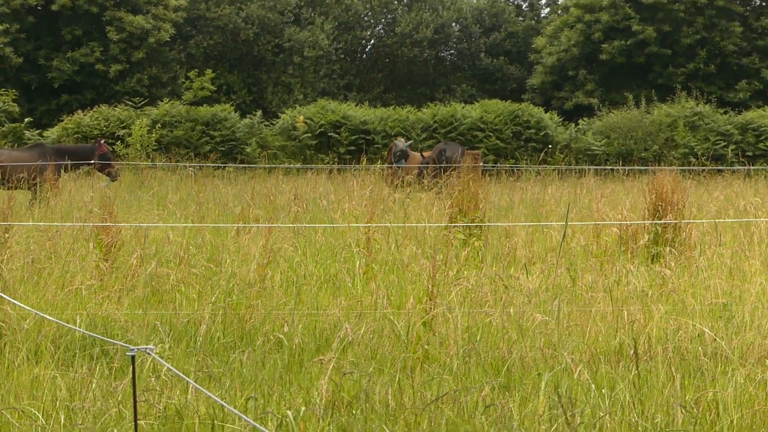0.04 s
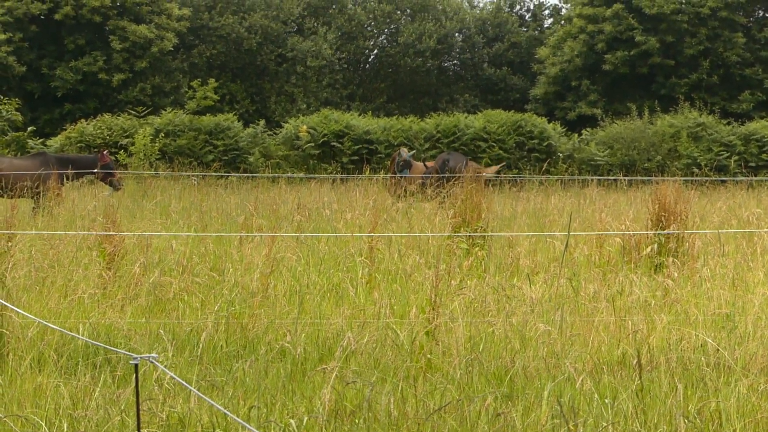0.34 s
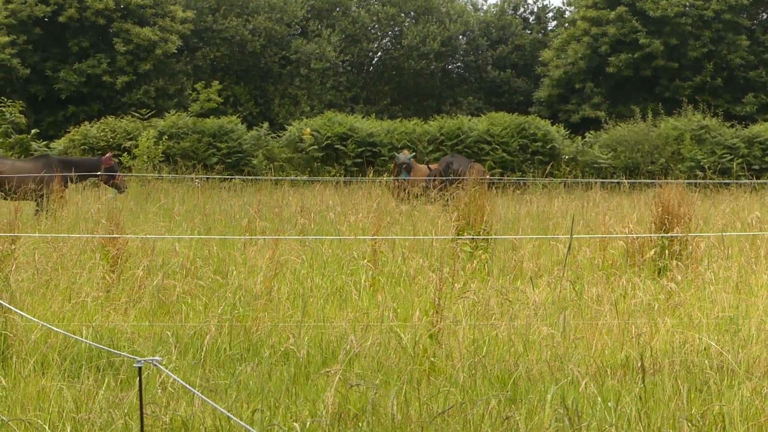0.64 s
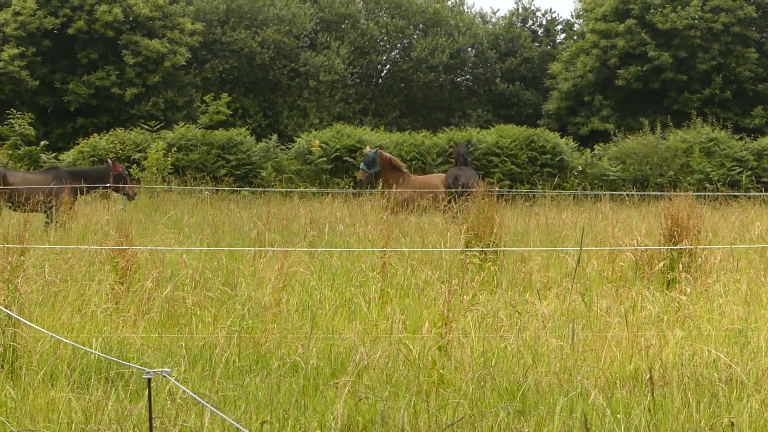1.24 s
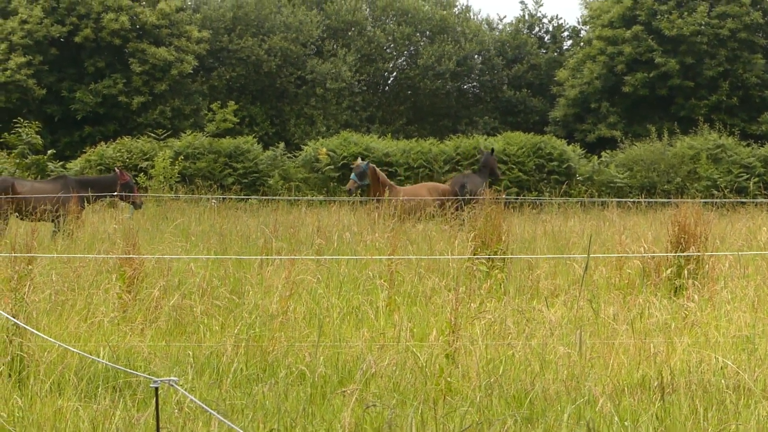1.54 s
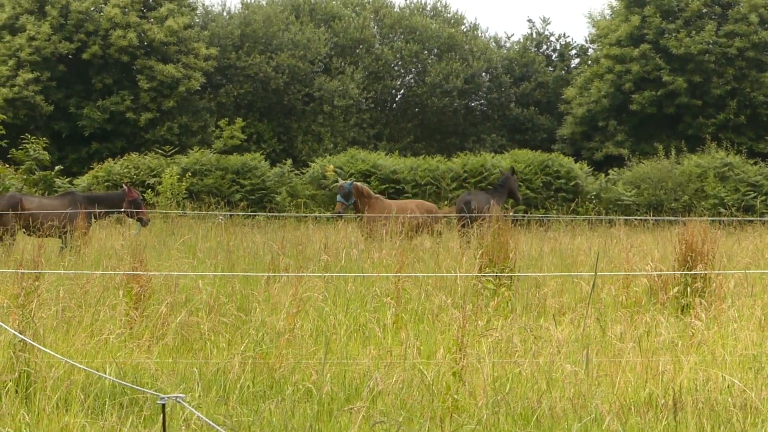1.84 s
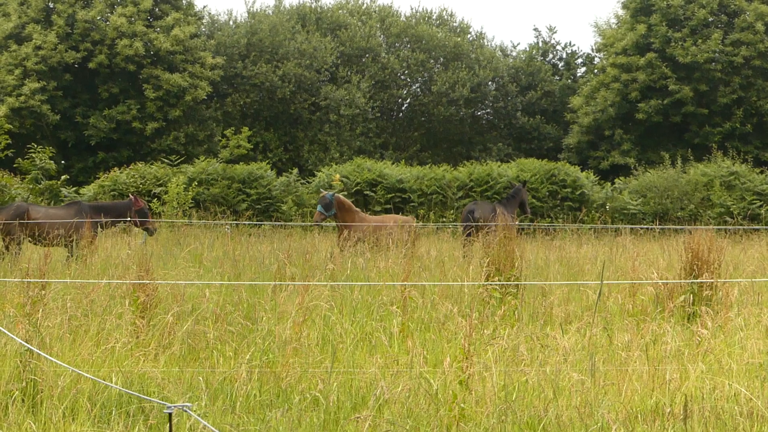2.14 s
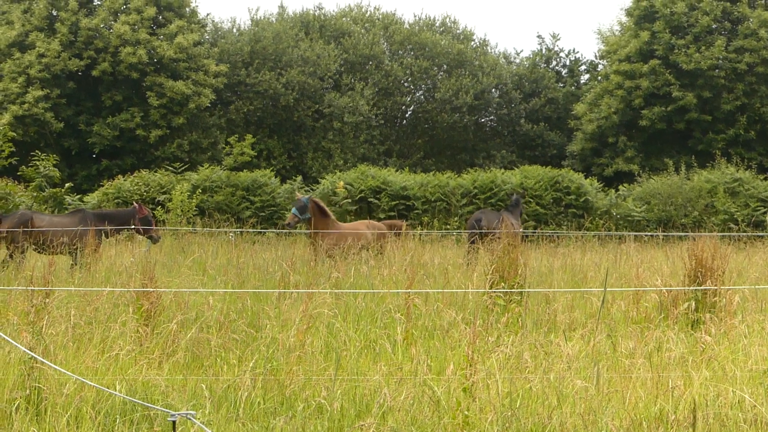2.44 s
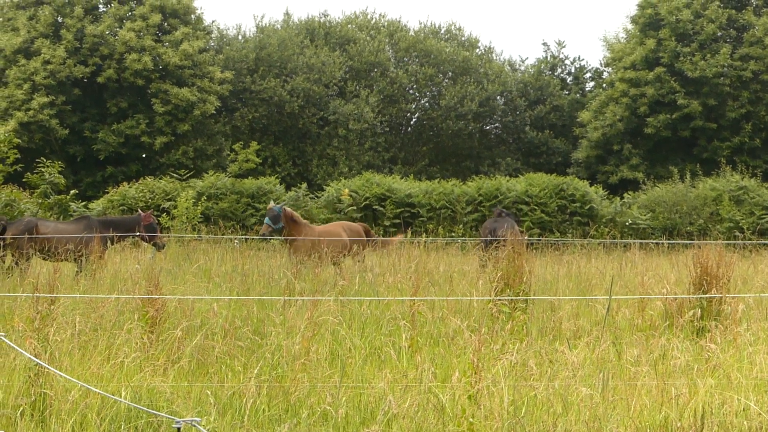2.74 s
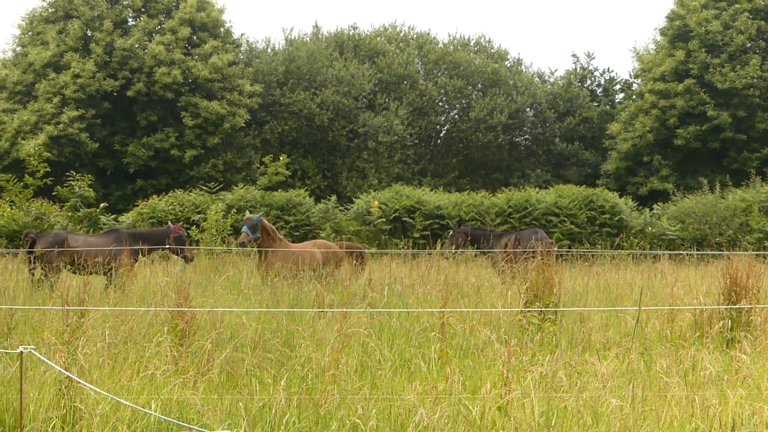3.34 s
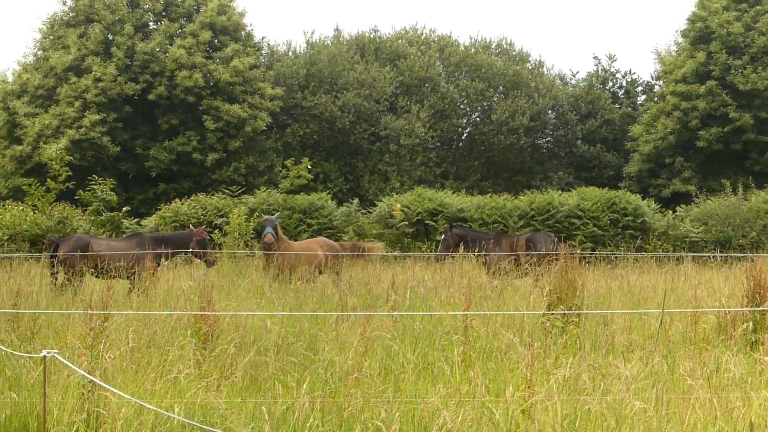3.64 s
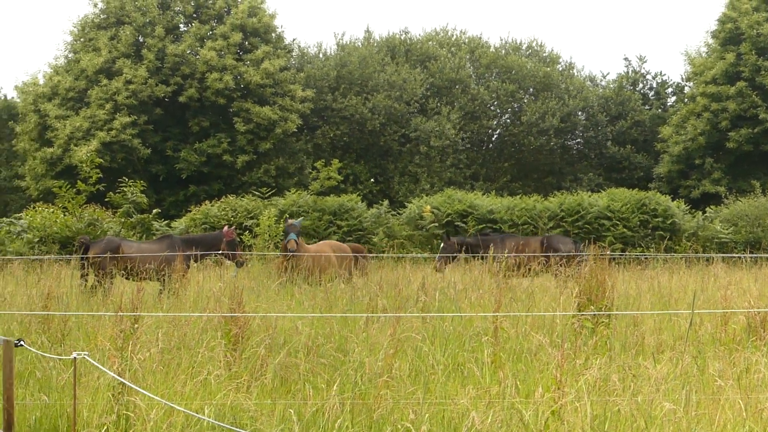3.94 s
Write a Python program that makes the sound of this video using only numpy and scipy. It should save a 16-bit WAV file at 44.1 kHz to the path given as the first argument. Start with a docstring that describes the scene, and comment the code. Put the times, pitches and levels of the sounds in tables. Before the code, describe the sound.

A horse's short, harsh squeal, followed by rustling grass and a songbird, with wind rumbling.

```python
"""A pasture edged by a hedge and trees, in stereo; low wind rumbles throughout over a faint hiss.
Faint birds call far off to the right. Across the grass a horse squeals: a thin rising tone in its
throat breaks under strain into a harsh scream, clears and falls away. It grunts, and the horses
scuffle in long grass. Nearer the microphone a finch sings from the hedge in gliding whistles (four
slurs, a trill, two buzzes, a flourish). The trees scatter every voice back."""
import sys
import numpy as np
from scipy import signal
from scipy.fft import rfft, irfft, next_fast_len
from scipy.io import wavfile
from scipy.ndimage import uniform_filter1d, map_coordinates

SR = 44100
rng = np.random.default_rng(int(sys.argv[2]) if len(sys.argv) > 2 else 0)


def dump_mix(stems):
    """Bounce the given channels to the path in sys.argv[1] as a 16-bit WAV at rate SR."""
    frames = np.atleast_2d(stems).T  # one column per channel
    limited = np.clip(frames, -1, 1)  # hard clip at full scale
    pcm = np.round(limited * 32767).astype(np.int16)
    wavfile.write(sys.argv[1], SR, pcm)


N = 176400

# Levels in the tables are relative; each source applies its own gains on top.
# Gusts at the microphone, roar and rumble: time_s, level_db
ROAR_GUSTS = [(0, -45), (.6, -30), (.88, -36.5), (1.02, -43.5), (1.25, -43.5), (1.65, -36.5), (1.9, -41),
              (2.12, -38), (2.45, -52), (3.2, -49), (4, -49.5)]
RUMBLE_GUSTS = [(0, -45.5), (1.7, -48.5), (2.3, -51), (2.7, -61), (3.4, -62.5), (4, -47)]
# Spectra of the gusts, the treetop breeze and the hiss: frequency_hz, level_db
ROAR_COLOUR = [(140, -67), (200, -13.5), (248, 1), (285, -6), (350, -17), (400, -11.5), (460, -26.5),
               (520, -23), (700, -47), (3000, -88)]
RUMBLE_COLOUR = [(20, -40), (55, -41), (95, -6.5), (143, 4), (220, -9.5), (400, -52)]
BREEZE_COLOUR = [(60, -20.5), (150, -2.5), (540, -3), (800, -12.5), (2500, -36)]
HISS_COLOUR = [(100, -64), (900, 8.5), (1800, -1), (3000, 4), (7500, -5.5), (9500, -1.5), (11800, 1.5),
               (13000, 7.5)]
# How long the trees take to fall 60 dB: frequency_hz, decay_s
TREE_DECAY = [(2000, 0.39), (12000, 1)]

# Far birds' syllables, one list per note: offset_s, base_pitch_hz, level_db
THIN_NOTES = [
    [(-.03, 6550, -1), (.06, 5590, 2)],
]
ARCH_NOTES = [
    [(-.045, 2700, -1), (-.01, 3350, 1), (.035, 3470, -2)],
]
TWITTER_NOTES = [
    [(-.002, 3126, 1.1), (.018, 3010, 2)],
]
# When they call: time_s, level_db, pitch_factor
THIN_CALLS = [(.645, -63, 0.98), (0.821, -65.5, 0.85)]
ARCH_CALLS = [(1.58, -55.5, 0.99)]

# The squeal's tone: time_s, pitch_hz, level_db
SQUEAL_TONE = [(.945, 1054, -75), (.975, 1240, -47.5), (1.005, 1422, -50), (1.045, 1558, -50.5),
               (1.12, 1307, -60), (1.27, 1294, -43), (1.325, 1359, -71), (1.365, 1379, -59),
               (1.40, 1323, -53), (1.455, 1159, -54)]
# Its harmonics 1-4: early_db, late_db
SQUEAL_HARMONICS = [(0, -13), (-19, -8), (-4, -5), (-10, -2.5)]
# Its harsh middle: time_s, level_db
SCREAM_LEVEL = [(1.0, -63), (1.055, -48), (1.09, -38), (1.16, -36.5), (1.21, -38.5), (1.27, -38.5),
                (1.335, -44.5), (1.5, -62.5)]
# Resonances of the horse's throat: early_hz, late_hz, width_hz, early_db, late_db
THROAT_RESONANCES = [(1120, 1300, 560, -.5, -8), (1935, 1985, 150, 1.5, -2), (2380, 2420, 600, -1, -2),
                     (2620, 3120, 300, -16, -2.5), (3830, 3850, 170, -3, -.5),
                     (4330, 4390, 320, -2.5, -2.5), (5350, 5370, 400, -1, 3.5), (5950, 6150, 750, -9, -10)]
# Rasping breath in the scream: frequency_hz, level_db
RASP_COLOUR = [(250, -9), (400, 2), (780, -2), (2300, 1.5), (3200, -22), (3600, 5), (6300, -4),
               (7500, -16.5), (9700, -12), (15000, -35)]

# Grass as the horses scuffle, grass as they part, and the grunt: time_s, level_db
SCUFFLE_LEVEL = [(1.35, -61), (1.8, -51), (2.1, -59), (2.7, -75)]
PARTING_LEVEL = [(3.3, -56), (3.42, -55), (4, -51.5)]
GRUNT_LEVEL = [(1.68, -75), (1.78, -47), (1.84, -66)]
# Spectra of the same three: frequency_hz, level_db
SCUFFLE_COLOUR = [(300, -19), (1200, 5), (2200, 0), (4500, -4), (7000, -13), (15000, -74)]
PARTING_COLOUR = [(300, -5), (1000, -3), (5000, 4), (7500, -11.5), (10000, -5), (15000, -12)]
GRUNT_SPECTRUM = [(700, -20), (1150, 9.5), (1600, -25), (4400, -4), (6500, -32)]

# The finch's syllables, one list per note: offset_s, base_pitch_hz, level_db
SLUR_NOTES = [
    [(-.108, 6700, -10), (-.092, 5210, -8), (-.07, 3314, -9.5)],
    [(-.07, 4303, -12), (-.035, 4358, -5.5), (-.008, 4280, -11)],
    [(-.004, 5140, 7), (0, 4160, 6), (.005, 3890, 1.5), (.016, 3850, -12)],
]
TRILL_NOTES = [
    [(-.021, 3550, -12), (-.016, 4100, -6), (.002, 4100, -11)],
    [(-.01, 3000, -13), (.001, 3200, -8), (.003, 3330, 5), (.012, 3700, 0), (.046, 3480, -10)],
    [(.031, 2220, -6), (.049, 2980, 5), (.055, 2450, -1), (.066, 2260, 3), (.081, 2150, -4)],
]
BUZZ_NOTES = [
    [(-.018, 4960, 3), (-.008, 6000, -5), (.005, 4700, 4), (.038, 4180, -7)],
]
FLOURISH_NOTES = [
    [(-.065, 2577, 3.5), (-.045, 2136, -21), (-.018, 3440, -3), (.03, 3790, -2.5), (.05, 2660, -6),
     (.07, 2086, -11), (.1, 1980, -6)],
]
# When it sings them: time_s, level_db, pitch_factor
SLUR_CALLS = [(2.11, -50, 0.94), (2.309, -43.5, 0.93), (2.499, -39, 0.95), (2.692, -36.5, 0.93)]
TRILL_CALLS = [(2.782, -38.5, 1.03), (2.93, -37, 1.01), (3.078, -36, 1.02), (3.229, -35, 1.015),
               (3.382, -35.5, .99), (3.533, -36.5, 1)]
BUZZ_CALLS = [(3.686, -40, 0.93), (3.769, -40.5, 0.94)]
FLOURISH_CALLS = [(3.899, -29.5, 1)]

# Hooves scuffing through the grass: peak_s, level_db
HOOF_STEPS = [(3.41, -47), (3.492, -52), (3.657, -45), (3.818, -40), (3.981, -41.5)]
# Their spectrum: frequency_hz, level_db
HOOF_COLOUR = [(130, -14), (420, 7.5), (780, -8), (1200, -7.5), (1400, 6.5), (1660, -11.5), (2100, -3),
               (10000, -32)]


def amp(db):
    return 10 ** (np.asarray(db) / 20)


def unit(x):
    return x / np.sqrt(np.mean(x ** 2) + 1e-20)


def along(points, hz):
    """Read (frequency_hz, value) points on a log frequency axis."""
    frequencies, values = np.transpose(points)
    return np.interp(np.log(hz + 1), np.log(frequencies + 1), values)


def curves(rows):
    """One value per sample for each column after the time."""
    times, *columns = np.transpose(rows)
    return [np.interp(np.arange(N) / SR, times, column) for column in columns]


def during(rows):
    """A gate open from the first row's time to the last."""
    t = np.arange(N) / SR
    return uniform_filter1d(1. * ((t >= rows[0][0]) & (t <= rows[-1][0])), size=128)


def wobble(rate):
    """A smooth random curve, rate knots a second."""
    return map_coordinates(rng.standard_normal(int(N * rate / SR) + 4), [np.arange(N) * rate / SR])


def filtered(x, response):
    """Shape x by a frequency response."""
    size = next_fast_len(N + SR // 2)
    return irfft(rfft(x, size) * response(np.fft.rfftfreq(size, 1 / SR)), size)[..., :N]


def stereo(mid, side, side_db):
    """Mid and side to left and right."""
    return np.array([mid + amp(side_db) * side, mid - amp(side_db) * side])


def rush(colour, side_db):
    """Coloured stereo noise of rms 1."""
    mid, side = filtered(rng.standard_normal((2, N)), lambda hz: amp(along(colour, hz)))
    return unit(stereo(mid, side, side_db))


def outdoors(x, near_db, near_s, far_db, side_db, pan_db):
    """Paths to the microphone: direct, off nearby leaves, off the trees. Positive pan is left."""
    hz, t, spectrum = signal.stft(rng.standard_normal((2, SR // 2)), SR, nperseg=256)
    decay = amp(-60 * t / along(TREE_DECAY, hz)[:, None])
    trees = signal.istft(spectrum * decay, SR, nperseg=256)[1]
    t = np.arange(trees.shape[1]) / SR
    leaves = rng.standard_normal(trees.shape) * t * np.exp(-2 * t / near_s)
    near = amp(near_db) * leaves / np.linalg.norm(leaves[0])
    far = amp(far_db) * trees / np.linalg.norm(trees[0])
    mid, side = near + far
    mid[0] += 1  # the direct sound
    paths = stereo(mid, side, side_db) / np.linalg.norm(mid)
    return signal.fftconvolve(x[None], paths, axes=1)[:, :N] * amp([[pan_db / 2], [-pan_db / 2]])


def wind(breeze_db=-51.5):
    """Gusts swell a hollow roar and a deeper rumble; a steady breeze spreads wide in the treetops."""
    roar = amp(curves(ROAR_GUSTS)[0]) * rush(ROAR_COLOUR, side_db=-15)
    rumble = amp(curves(RUMBLE_GUSTS)[0]) * rush(RUMBLE_COLOUR, side_db=-8)
    return roar + rumble + amp(breeze_db) * rush(BREEZE_COLOUR, side_db=6)


def hiss(level_db=-50.5):
    """A faint, even hiss behind everything."""
    return amp(level_db) * rush(HISS_COLOUR, side_db=-5.5)


def bird(notes, calls, buzz_hz=150, buzz=0., rough=.0021, scatter_db=1.2):
    """Each call whistles the same gliding notes; a fast flutter of pitch makes them buzz or rasp."""
    song = np.zeros(N + SR)
    flutter = 1 + buzz * np.sin(2 * np.pi * buzz_hz * np.arange(N) / SR) + rough * wobble(700)
    for time_s, call_db, pitch_factor in calls:
        for note in notes:
            offsets, hz, note_db = np.transpose(note)
            span = np.arange(max(int((time_s + offsets[0]) * SR), 0), int((time_s + offsets[-1]) * SR))
            t = span / SR - time_s
            pitch = pitch_factor * np.interp(t, offsets, hz) * flutter[span % N]
            phase = 2 * np.pi * np.cumsum(pitch) / SR
            whistle = np.sqrt(2) * (np.sin(phase) + amp(-38) * np.sin(2 * phase))
            level = amp(call_db + rng.normal(0, scatter_db) + np.interp(t, offsets, note_db))
            song[span] += level * signal.windows.tukey(len(span), .1) * whistle
    return song[:N]


def far_birds(start_s=.075, gap_s=.065, twitter_db=-65):
    """Deep in the trees to the right: an even twitter, two thin falling whistles, an arched call."""
    thin = bird(THIN_NOTES, THIN_CALLS, rough=.021)
    arch = bird(ARCH_NOTES, ARCH_CALLS, rough=.025)
    twitter = bird(TWITTER_NOTES, [(start_s + k * gap_s, twitter_db, 1) for k in range(12)])
    return outdoors(thin + arch + twitter, near_db=-17, near_s=.009, far_db=1, side_db=-7, pan_db=-5.5)


def horse_squeal():
    """A whistling tone sweeps through the throat's gliding resonances and turns chaotic under strain."""
    jitter, strain_jitter = .011, .025  # shares of the pitch
    wander_hz, surge_db, shimmer_db, knots_per_s = 50, 2.8, 3.5, 45
    leak, rasp_db = .3, -7.5  # leak: share of the tone that passes between resonances
    pitch, tone_db = curves(SQUEAL_TONE)
    scream = amp(curves(SCREAM_LEVEL)[0]) * during(SCREAM_LEVEL)
    strain = scream / scream.max()
    overtones_in, = curves([(.983, 0), (1.008, 1)])
    throat_change, = curves([(1.13, 0), (1.29, 1)])
    shift = lambda early, late: early + (late - early) * throat_change
    phasor = lambda hz: np.exp(2j * np.pi * np.cumsum(hz) / SR)
    bell = lambda offset, width: 1 / (1 + (2 * offset / width) ** 2)
    throat = []
    for early_hz, late_hz, width, early_db, late_db in THROAT_RESONANCES:
        centre = shift(early_hz, late_hz) + wander_hz * wobble(knots_per_s)
        throat.append((centre, width, amp(shift(early_db, late_db))))
    cycle = phasor(pitch * (1 + jitter * wobble(250) + strain_jitter * strain * wobble(600)))
    tone = ringing = 0
    for k, levels in enumerate(SQUEAL_HARMONICS, 1):
        passed = leak + sum(gain * bell(k * pitch - centre, width) for centre, width, gain in throat)
        level = amp(shift(*levels) + shimmer_db * wobble(knots_per_s))
        tone += (overtones_in if k > 1 else 1) * passed * level * (cycle ** k).imag
    for centre, width, gain in throat:  # each resonance carries its own surging band of noise
        real, imag = filtered(rng.standard_normal((2, N)), lambda hz: bell(hz, 2 * width) ** 4)
        band = unit(((real + 1j * imag) * phasor(centre)).real)
        ringing += gain * amp(surge_db * wobble(knots_per_s)) * band
    puffs = rng.standard_normal(N) * (1 + cycle.real)  # breath pulsing at the pitch
    rasp = unit(filtered(puffs, lambda hz: amp(along(RASP_COLOUR, hz))))
    harsh = (unit(ringing) + amp(rasp_db) * rasp) * amp(2.2 * wobble(220))
    return 2 * tone * amp(tone_db) * during(SQUEAL_TONE) + scream * harsh


def grass(levels, colour, flicker_db=1.9):
    """Long grass rustles unevenly as the horses push through it."""
    level = amp(curves(levels)[0] + flicker_db * wobble(50)) * during(levels)
    return level * rush(colour, side_db=-5)


def horse_grunt(flutter_db=1.8):
    """A hoarse, fluttering puff through the throat."""
    level = amp(curves(GRUNT_LEVEL)[0] + flutter_db * wobble(120)) * during(GRUNT_LEVEL)
    return level * rush(GRUNT_SPECTRUM, side_db=-2)[0]


def finch(echo_s=.02, echo_db=-14):
    """One whistled song from just left of centre, with a first echo off the hedge."""
    flick, whistle, hook = SLUR_NOTES
    same_pitch_calls = [(time_s, level_db, 1) for time_s, level_db, _ in SLUR_CALLS]
    song = bird([flick], SLUR_CALLS, rough=.069) + bird([hook], SLUR_CALLS)
    song += bird([whistle], same_pitch_calls, rough=.0014)
    song += bird(TRILL_NOTES, TRILL_CALLS, rough=.022)
    song += bird(BUZZ_NOTES, BUZZ_CALLS, buzz_hz=255, buzz=.18, rough=.085)
    song += bird(FLOURISH_NOTES, FLOURISH_CALLS, buzz_hz=116.1, buzz=.08, rough=.019)
    echo = amp(echo_db) * filtered(song, lambda hz: np.exp(-2j * np.pi * hz * echo_s))
    return outdoors(song + echo, near_db=1.5, near_s=.018, far_db=1.5, side_db=-8.5, pan_db=1.2)


def hooves(rise_s=.029, fall_s=.052):
    """Each scuffing step swells quickly and dies away in the grass."""
    t = np.arange(N) / SR
    steps = 0
    for peak_s, level_db in HOOF_STEPS:
        steps += amp(level_db) * np.exp(-np.maximum((peak_s - t) / rise_s, (t - peak_s) / fall_s))
    return steps * rush(HOOF_COLOUR, side_db=-6.5)


def scene():
    """The pasture from the microphone's position, the horse almost straight ahead."""
    voice = horse_squeal() + horse_grunt()
    horse = outdoors(voice, near_db=-5, near_s=.013, far_db=-15, side_db=-6, pan_db=-.5)
    surroundings = finch() + far_birds() + wind()
    rustle = grass(SCUFFLE_LEVEL, SCUFFLE_COLOUR) + grass(PARTING_LEVEL, PARTING_COLOUR)
    return horse + surroundings + rustle + hooves() + hiss()


def record(dry):
    """The recorder keeps nothing above its band limit."""
    top_hz = 15800
    return filtered(dry, lambda hz: hz < top_hz)


dry = scene()
out = record(dry)
dump_mix(out)
```